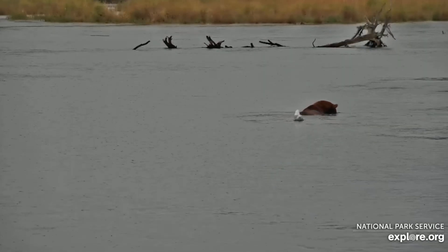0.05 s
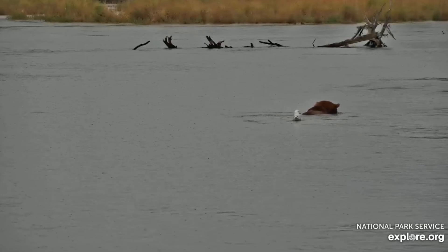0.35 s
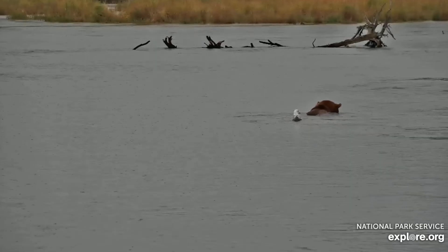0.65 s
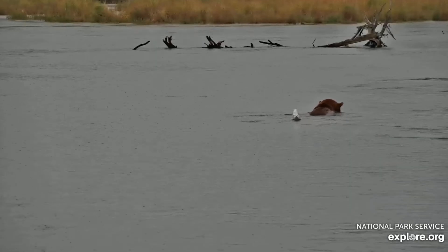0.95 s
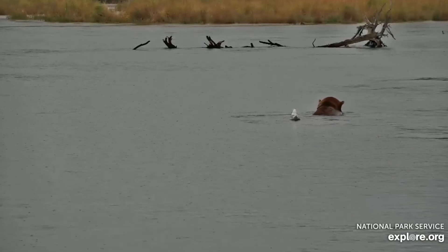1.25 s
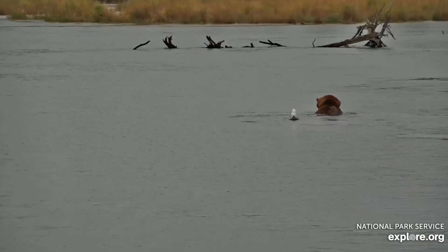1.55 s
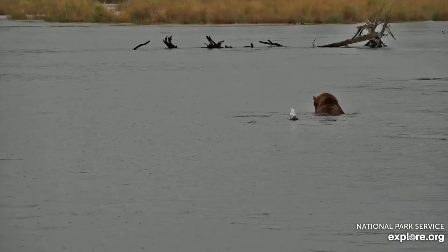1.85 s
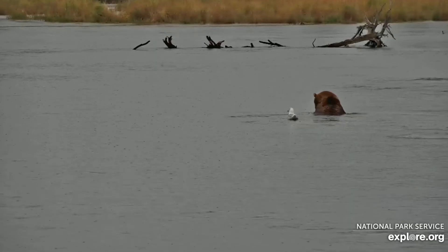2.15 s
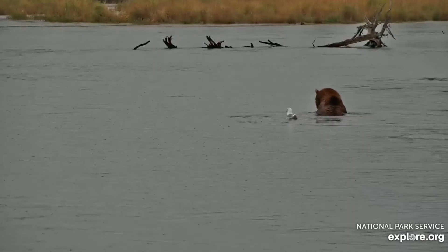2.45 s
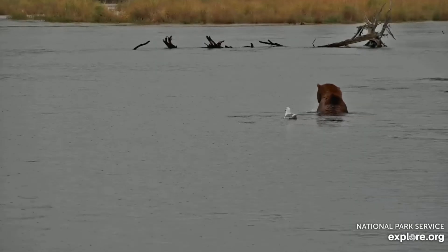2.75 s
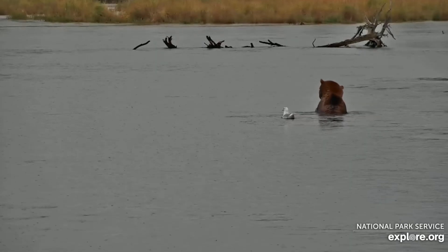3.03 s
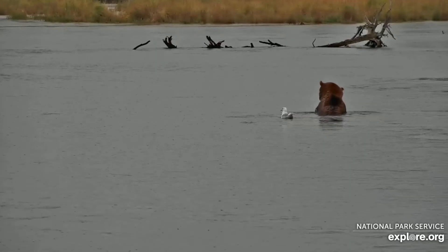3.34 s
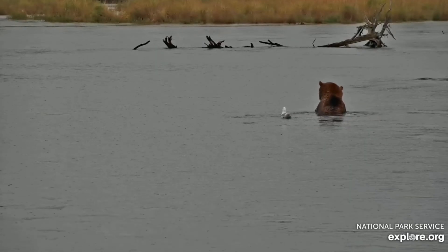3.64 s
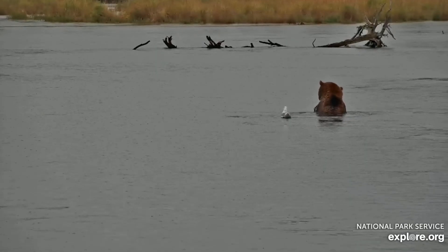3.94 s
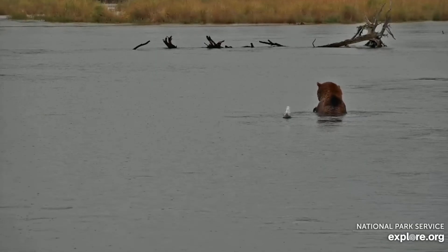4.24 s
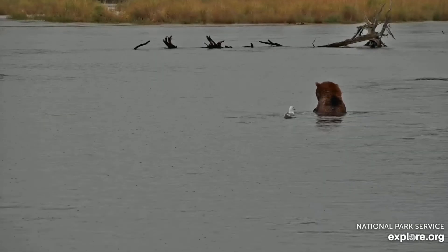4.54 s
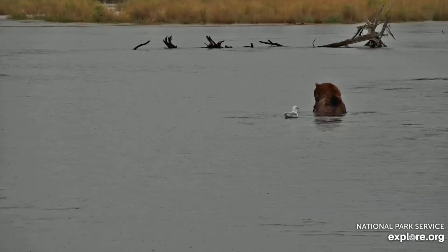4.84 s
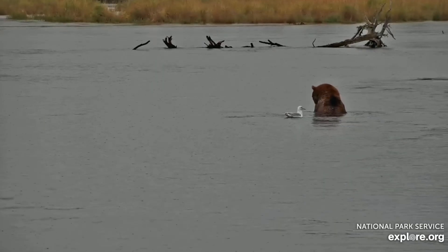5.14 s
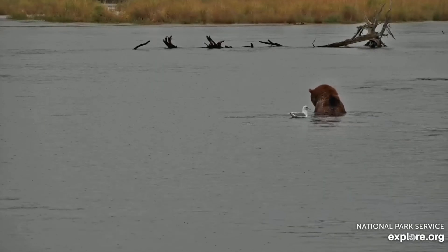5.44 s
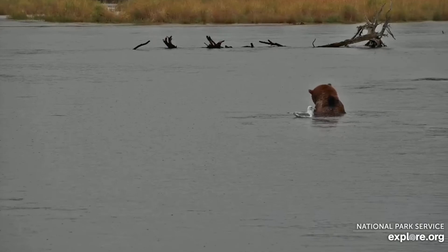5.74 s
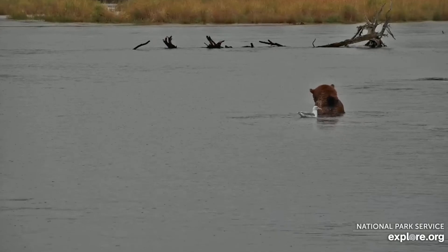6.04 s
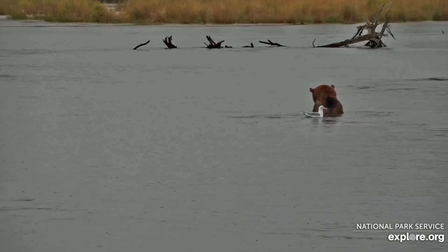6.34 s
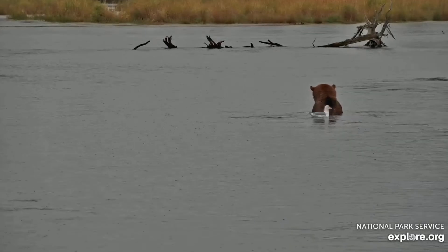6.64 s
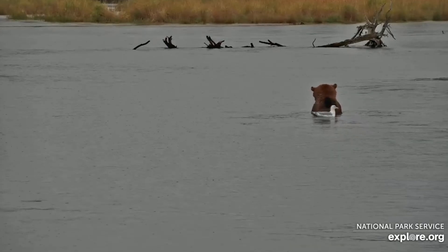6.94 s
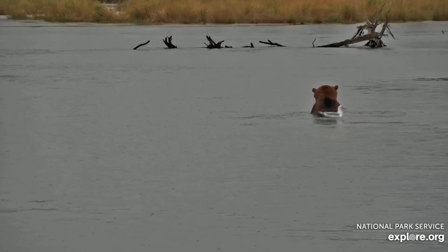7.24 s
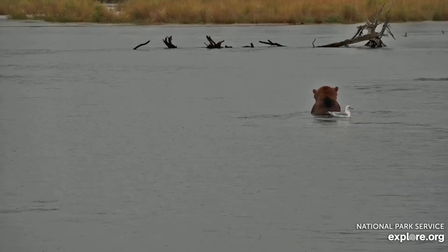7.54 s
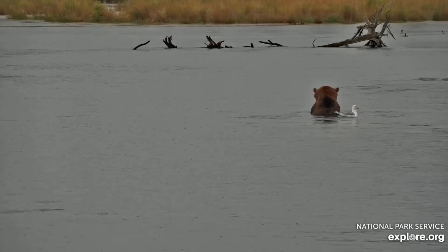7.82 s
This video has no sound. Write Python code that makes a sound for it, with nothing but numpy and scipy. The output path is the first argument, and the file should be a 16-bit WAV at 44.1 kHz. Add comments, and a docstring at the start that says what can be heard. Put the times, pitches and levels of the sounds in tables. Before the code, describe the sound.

Beside a softly rushing river, a bird gives seven hoarse, rising rasps while another pipes short, even notes throughout. Small birds add a few thin, high whistles, and a far bird wails faintly twice. Midway, a cluster of soft knocks and low wind thumps hits the microphone. The piping then grows louder and eases again, and the sound cuts out for a moment near the end.

```python
"""Birds call beside a wide river: one rasps seven times while another pipes on and on.
Each call is a vibration of the syrinx, whose harmonics the throat filters. Small birds add upslurred
whistles and a thin chip, a far bird wails twice, and the trees on the bank scatter every call.
Soft knocks and gusts thump the microphone over the broadband rush of the water and a faint
electrical whine. The sound drops out for a moment near the end."""
import sys
import numpy as np
from scipy import signal
from scipy.fft import rfft, irfft
from scipy.io import wavfile

SR = 44100
rng = np.random.default_rng(int(sys.argv[2]) if len(sys.argv) > 2 else 0)


def materialize(psi):
    """Save the field psi as 16-bit PCM at rate SR to the path in sys.argv[1].

    A 1-D psi becomes a single channel; in a 2-D psi each row is a channel.
    """
    bounded = np.clip(np.atleast_2d(psi).T, -1, 1)
    quanta = np.round(bounded * 32767).astype(np.int16)
    wavfile.write(sys.argv[1], SR, quanta)


N = 356328
TIME = np.arange(N) / SR

# Rasps. Each row: start in seconds, length in seconds, relative level in dB, pitch ratio.
RASP_NOTES = [(0, 0.096, -39, 0.89), (0.171, 0.11, -36.5, 1), (0.355, .11, -35, 1.03),
              (0.541, .12, -36, 0.97), (0.758, .115, -36, .99), (0.965, 0.13, -37.5, 0.96),
              (1.205, 0.12, -43.5, 0.87)]
# Throat filters of the rasping and the piping bird. Each row: frequency in Hz, gain in dB.
RASP_FILTER = [(900, -22), (1600, -9), (2100, -7), (2850, 1), (3250, -7), (4000, -24), (5100, -42),
               (6200, -34)]
PIPE_FILTER = [(1250, -11.5), (1700, -3.5), (2200, -5.5), (2600, -1.5), (3300, -15.5), (4000, -19),
               (5300, -30.5)]
# Stretches of even piping. Each row: start in seconds, time from note to note in seconds.
PIPE_PERIODS = [(.235, 0.22), (1.541, 0.22), (2.639, 0.22), (3.744, 0.22), (4.392, .218), (4.609, .2275),
                (5.513, .2216), (6.663, 0.27), (7.467, 0.24)]
# How hard the piping bird calls. Each row: time in seconds, relative level in dB.
PIPE_LEVELS = [(.2, -43), (.9, -44.5), (1.55, -41.5), (2.35, -38.5), (2.66, -45.5), (4.17, -44),
               (4.5, -38.5), (5.29, -37), (5.51, -31.5), (5.98, -31), (6.25, -35.5), (6.65, -49),
               (7.47, -42), (7.95, -48.5)]
# The held and the slurred part of a piped note. Each row: delay in seconds, length in seconds,
# pitch in Hz, sharp start in Hz, fall in Hz, relative level in dB, unsteadiness from 0 to 1.
PIPE_NOTE_PARTS = [(0, 0.036, 1312, 24.7, 24.9, 0.5, 0), (.035, .048, 1307, 237.6, 319.4, -5, 0.84)]
# Small birds' whistles and a far bird's wails. Each row: start in seconds, length in seconds, target
# pitch in Hz, level in dB, swell in dB, sag in Hz, time in the low register in seconds.
WHISTLE_NOTES = [(1.870, 0.064, 4220, -47.5, -2, 354, 0.0053), (2.289, 0.057, 4210, -45, 4, 500, .006),
                 (2.776, 0.054, 4260, -48.5, -6.5, 403, 0.0068), (3.091, .041, 6400, -24, 6, 2.5, .013),
                 (3.170, 0.063, 4940, -28, 8, 0, 0.0027), (4.058, 0.043, 6100, -31, -2, -2, 0.012),
                 (4.137, 0.077, 5475, -33, 7.5, 0, 0.0062), (4.970, .045, 4370, -50.5, -6, 404, .006)]
WAIL_NOTES = [(.08, 0.71, 1610, -57.5, -1, 0.0045, 0.0058), (1.6, .54, 1618, -56.5, 2, 0, 0)]
# Knocks and gusts at the microphone. Each row: time in seconds, envelope peak in dB, pitch in Hz.
KNOCK_PULSES = [(2.379, -22.5, 177), (2.484, -18, 230), (2.533, -24, 182), (2.608, -11.7, 228),
                (2.628, -14.5, 198.0), (2.678, -21.5, 188.0), (2.8, -27, 163), (3.007, -20, 192),
                (3.052, -19.5, 164.5), (3.076, -14.5, 182), (3.161, -12.5, 255), (3.177, -8, 206),
                (3.245, -16.8, 202), (3.333, -21.5, 227.0), (3.368, -11, 233), (3.386, -14.3, 233.0),
                (3.506, -13.4, 201), (3.534, -15.4, 246), (3.551, -16, 199.0), (3.673, -22.5, 220),
                (3.718, -13.1, 213.0), (3.728, -16.6, 192), (3.758, -15, 242), (3.805, -21, 265),
                (3.873, -20.5, 136), (3.942, -19, 185.4), (3.966, -15.1, 256), (3.978, -16.5, 188),
                (4.081, -16, 206), (4.223, -23.6, 195), (4.299, -16.0, 171), (4.339, -21, 184),
                (4.408, -21.5, 189.0), (4.594, -27.5, 190), (4.694, -29.5, 174), (5.728, -31.5, 155),
                (6.149, -23, 194), (6.523, -29.5, 126), (7.921, -29.2, 222), (7.949, -21.5, 228),
                (7.964, -21, 212), (8.046, -25, 194)]
GUST_PULSES = [(1.043, -33, 47), (2.895, -28, 55.3), (3.235, -23, 45.4), (3.315, -28, 40), (3.69, -32, 49),
               (3.849, -19, 54), (3.875, -11, 64), (4.312, -17.5, 70), (4.36, -21.3, 51), (4.464, -26, 57),
               (4.583, -22, 53.5), (5.513, -27.5, 51), (6.534, -17.5, 71), (6.743, -24, 57.7),
               (7.213, -28.8, 51), (7.311, -25, 57.2), (7.403, -25.5, 55.5), (7.79, -29, 48)]
# Spells of wind. Each row: start in seconds, end in seconds, relative level in dB, build-up in dB/s.
RUMBLE_SPELLS = [(3.353, 4.363, -36, 20), (5.544, 5.893, -41.5, 68), (6.653, 7.846, -41.5, 15)]
# Spectrum of the rushing water. Each row: frequency in Hz, relative spectral density in dB.
RIVER_SPECTRUM = [(25, -20.5), (85, -24.5), (140, -8), (280, 0.5), (440, -5.5), (650, -9.5), (900, -14.5),
                  (2000, -19.5), (2600, -20), (3300, -23.5), (6000, -26), (9000, -30), (10500, -32.5),
                  (15500, -36)]
# Gurgles. Each row: start in seconds, length in seconds, initial level in dB, centre frequency in Hz.
RIVER_GURGLES = [(6.796, 0.056, -36, 490), (6.803, 0.064, -44, 1100), (7.606, 0.13, -50, 1004)]
# Electrical whine. One row: centre frequency in Hz, resonance width in Hz, level in dB.
WHINE_BAND = (11880, 260, -72)


def rasping():
    """Irregular modulation of pitch and amplitude makes a hoarse note, which clears as it rises."""
    low_hz, crest_hz, crest_share, swell_db = 897, 1431, .9, 15
    out = np.zeros(N)
    for s, length, db, ratio in RASP_NOTES:
        size = int(length * SR)
        along = np.linspace(0, 1, size)
        climb = np.minimum(along / crest_share, 1) ** 2.3
        rough = .9 * (1 - .51 * climb)
        hz = ratio * (low_hz + (crest_hz - low_hz) * climb)
        pitch = hz * (1 + .05 * rough * walk(600, size))
        note = voice(pitch, RASP_FILTER, odd=.84) * (1 + .78 * rough * walk(610, size))
        hiss = undb(-7) * rough * noise(lambda f: colour(f, RASP_FILTER), size)
        bright = undb(-13) * along * band(4680, 1500, size)  # the bill opens towards the end
        gain = undb(db - 2 - swell_db * (1 - along) ** 3)
        gain *= envelope(TIME[:size], attack_s=.005, release_s=.0088)
        add(out, s, (note + hiss + bright) * gain)
    return out


def piping():
    """Throat resonance favours the second harmonic; odd harmonics turn each note's falling half nasal."""
    settle_s, scatter_db, scatter_share = .004, .9, .006
    out = np.zeros(N)
    for s in beats(PIPE_PERIODS):
        db = np.interp(s, *np.transpose(PIPE_LEVELS))
        for delay, length, hz, sharp_hz, fall_hz, part_db, unsteady in PIPE_NOTE_PARTS:
            t = TIME[:int(length * SR)]
            louder, higher = rng.standard_normal(2)
            pitch = hz + sharp_hz * np.exp(-t / settle_s) - fall_hz * (t / length) ** 2
            pitch *= 1 + scatter_share * higher + .018 * unsteady * walk(350, len(t))
            level_db = db + part_db + scatter_db * louder + 3.3 * unsteady * walk(60, len(t))
            slur_db = 1.3 * (-31.5 - db) * (delay + t)  # soft notes fade less towards their end
            note = voice(pitch, PIPE_FILTER, odd=unsteady) * undb(level_db + slur_db)
            add(out, s + delay, note * envelope(t, attack_s=.003, release_s=.0087))
        t = TIME[:SR // 20]
        scratch = band(3400, 600, len(t)) * np.exp(-t / .0035)
        add(out, s, undb(db - 11) * scratch)
    return out


def voice(pitch_hz, throat, odd):
    """Source and filter: the throat weights five harmonics of the syrinx; odd scales the odd ones."""
    phase = 2 * np.pi * np.cumsum(pitch_hz) / SR
    return sum(colour(k * pitch_hz, throat) * odd ** (k % 2) * np.sin(k * phase) for k in range(1, 6))


def whistling(notes, scoop, rise_share, drop, drop_s, attack_s, release_s, waver, overtone_db):
    """Frequency glides: a note scoops up, jumps register on the way and drops as it ends."""
    out = np.zeros(N)
    for s, length, target_hz, db, swell_db, sag_hz, low_s in notes:
        t = TIME[:int(length * SR)]
        along = t / length
        glide = 1 - scoop * np.exp(-along / rise_share) - drop * np.exp((t - length) / drop_s)
        register = np.where(t < low_s, .9, 1)
        hz = (target_hz * glide - sag_hz * along) * register
        gain = undb(db + swell_db * (along - .5)) * envelope(t, attack_s, release_s)
        add(out, s, tone(hz, waver, overtone_db) * gain)
    return out


def chipping(start_s, length_s, high_hz, low_hz, buzz_hz):
    """A throbbing membrane modulates the amplitude of a very high note that dips and rises."""
    out, t = np.zeros(N), TIME[:int(length_s * SR)]
    from_middle = t / length_s - .5
    hz = low_hz + (high_hz - low_hz) * (2 * from_middle) ** 2
    gain = undb(-30 + 6.5 * from_middle) * envelope(t, attack_s=.0046, release_s=.0041)
    buzz = 1 + .37 * np.sin(2 * np.pi * buzz_hz * t)
    add(out, start_s, tone(hz, waver=.0032, overtone_db=-25) * gain * buzz)
    return out


def tone(hz, waver, overtone_db):
    """Nearly sinusoidal vibration: a wavering fundamental with a faint octave."""
    phase = 2 * np.pi * np.cumsum(hz * (1 + waver * walk(260, len(hz)))) / SR
    return np.sin(phase) + undb(overtone_db) * np.sin(2 * phase)


def bank(call, tail_db, t60_s, early_db, early_s):
    """Scattering by trees adds early reflections, then a decaying tail with one stronger echo."""
    t = TIME[:SR]
    echo = 1 + .6 * np.exp(-((t - .095) / .0067) ** 2)
    tail = unit(rng.standard_normal(SR) * undb(-60 * t / t60_s) * np.minimum(t / .025, 1) * echo)
    early = unit(rng.standard_normal(SR) * t * np.exp(-t / early_s))
    response = (undb(tail_db) * tail + undb(early_db) * early) / np.sqrt(SR)
    return call + signal.fftconvolve(call, response)[:N]


def knocking():
    """Soft pulses at the microphone, each in a low flutter that follows their smoothed energy."""
    rise_s, decay_s = .03, .06
    knocks = thumps(KNOCK_PULSES, cycles=.59, sag=.14)
    t = TIME[:SR] - .5
    window = np.exp(np.minimum(t / rise_s, -t / decay_s))
    energy = np.abs(signal.fftconvolve(knocks ** 2, window / window.sum(), mode="same"))
    flutter = band(162, 110) * np.sqrt(energy) * undb(-7 + 3 * walk(22))
    return knocks + flutter


def wind():
    """Fluctuating air pressure on the microphone: spells of rumble, and thumps from single gusts."""
    calm_db, fall_db_per_s = -63, 37
    strength = undb(calm_db)
    for start, end, db, build_db_per_s in RUMBLE_SPELLS:
        before_db = build_db_per_s * np.maximum(start - TIME, 0)
        after_db = fall_db_per_s * np.maximum(TIME - end, 0)
        strength = np.maximum(strength, undb(db - before_db - after_db))
    rumble = band(42, 58) * strength * undb(-1.5 + 2.8 * walk(4.6))
    return rumble + thumps(GUST_PULSES, cycles=.41, sag=.043)


def thumps(rows, cycles, sag):
    """Wave packets: a swing of a cycle or two swells, sinks in pitch and dies."""
    out = np.zeros(N)
    for (s, db, hz), turn in zip(rows, rng.random(len(rows))):
        periods = np.arange(-3, 3, hz / SR)
        swing = np.cos(2 * np.pi * (periods - sag * periods ** 2 + turn)) / np.cosh(periods / cycles)
        add(out, s - 3 / hz, undb(db) * swing * signal.windows.tukey(len(periods), .5))
    return out


def river():
    """Flowing water radiates broadband noise that swells slightly, with a few narrow-band gurgles."""
    out = noise(lambda hz: colour(hz, RIVER_SPECTRUM))
    out *= undb(-43 + .45 * walk(1.4) + .36 * walk(18))
    for s, length, db, hz in RIVER_GURGLES:
        size = int(length * SR)
        add(out, s, band(hz, .272 * hz, size) * undb(db) * np.linspace(1, 0, size))
    return out


def whine():
    """Electrical noise in a narrow band is heard as a thin, high pitch."""
    hz, width_hz, db = WHINE_BAND
    return band(hz, width_hz) * undb(db)


def beats(tempo):
    """Note times: each stretch keeps its period until the next one starts."""
    ends = [s for s, _ in tempo[1:]] + [N / SR]
    return np.concatenate([np.arange(s, end - gap / 2, gap) for (s, gap), end in zip(tempo, ends)])


def envelope(t, attack_s, release_s):
    """Linear attack, hold and release over the times t."""
    return np.clip(t / attack_s, 0, 1) * np.clip((t[-1] - t) / release_s, 0, 1)


def colour(hz, points):
    """Gain of a (Hz, dB) spectrum, interpolated in log frequency."""
    points_hz, points_db = np.transpose(points)
    return undb(np.interp(np.log(np.maximum(hz, 1)), np.log(points_hz), points_db))


def noise(gain, size=N):
    """Noise of rms 1 whose spectrum follows gain(Hz)."""
    hz = np.maximum(np.fft.rfftfreq(size, 1 / SR), 1)
    return unit(irfft(rfft(rng.standard_normal(size)) * gain(hz), size))


def band(centre_hz, width_hz, size=N):
    """Noise through two equal resonances in series."""
    return noise(lambda hz: 1 / (1 + ((hz ** 2 - centre_hz ** 2) / (hz * width_hz)) ** 2), size)


def walk(rate_hz, size=N):
    """Smooth random fluctuation: noise of spread about 1, low-passed at rate_hz."""
    return noise(lambda hz: 1 / (1 + (hz / rate_hz) ** 4), size + SR // 4)[:size]


def undb(db):
    """Decibels to amplitude ratio."""
    return 10 ** (np.asarray(db) / 20)


def unit(x):
    """Scale to rms 1."""
    return x / np.sqrt(np.mean(x ** 2))


def add(out, s, x):
    """Mix x into out from time s."""
    i = min(max(int(s * SR), 0), N)
    out[i:i + len(x)] += x[:N - i]


def scene():
    """Superposition: the calls and their echoes add to knocks, wind, river and whine in one channel."""
    whistles = whistling(WHISTLE_NOTES, scoop=.26, rise_share=.18, drop=.3, drop_s=.003,
                         attack_s=.0064, release_s=.018, waver=.0091, overtone_db=-28.5)
    wails = whistling(WAIL_NOTES, scoop=.1, rise_share=.4, drop=.093, drop_s=.055,
                      attack_s=.034, release_s=.16, waver=.0074, overtone_db=-24)
    birds = bank(piping(), tail_db=-11, t60_s=.65, early_db=-24, early_s=.01)
    birds += bank(rasping(), tail_db=-10.5, t60_s=.57, early_db=-14.5, early_s=.0071)
    birds += bank(whistles, tail_db=-6.5, t60_s=.48, early_db=-8, early_s=.012)
    chip = chipping(start_s=7.169, length_s=.025, high_hz=10600, low_hz=7060, buzz_hz=893)
    birds += bank(chip, tail_db=-14, t60_s=.54, early_db=-6, early_s=.0072)
    birds += bank(wails, tail_db=-3, t60_s=.41, early_db=-16, early_s=.01)
    return (birds + whine() + knocking() + wind() + river())[None]


def record(dry):
    """Gating and band limiting: the signal drops out briefly, and a steep low-pass cuts the top."""
    dropout_start_s, dropout_end_s, cutoff_hz = 6.848, 7.148, 15700
    live = (TIME < dropout_start_s) | (TIME > dropout_end_s)
    low_pass = signal.ellip(10, .2, 80, cutoff_hz, fs=SR, output="sos")
    return signal.sosfilt(low_pass, dry * live)


dry = scene()
out = record(dry)
materialize(out)
```